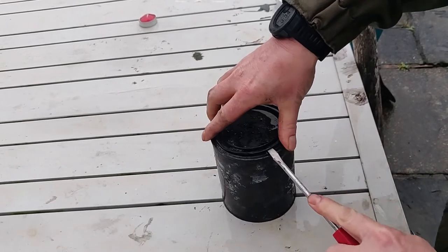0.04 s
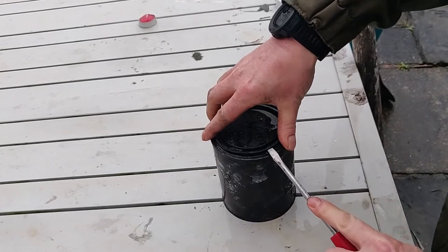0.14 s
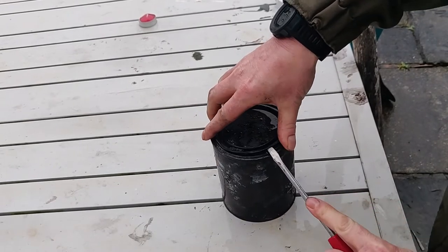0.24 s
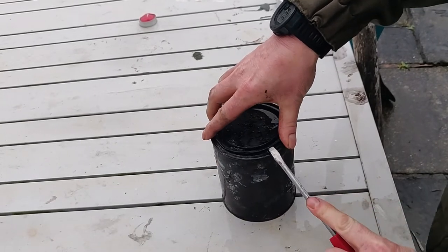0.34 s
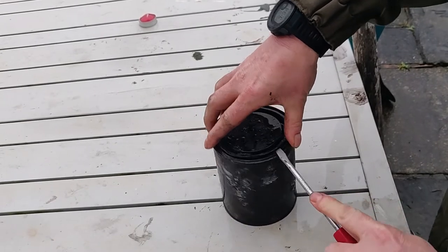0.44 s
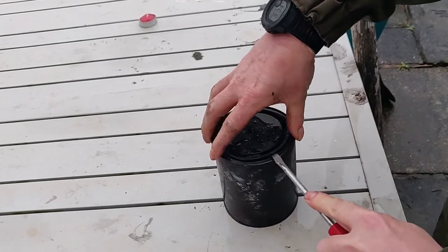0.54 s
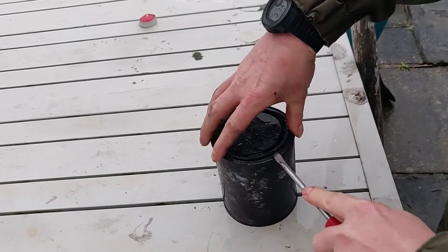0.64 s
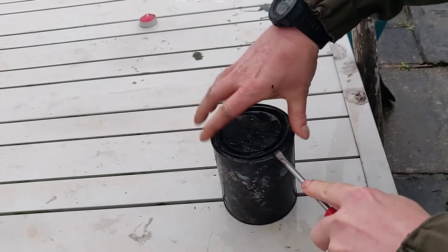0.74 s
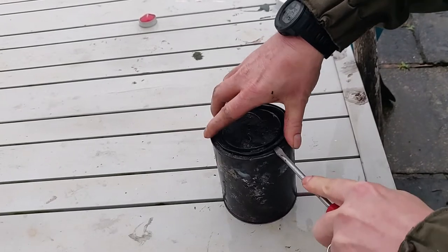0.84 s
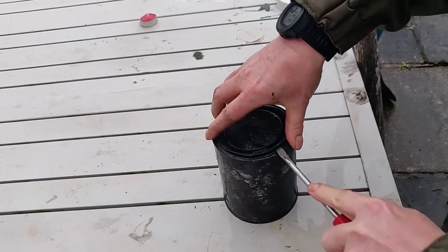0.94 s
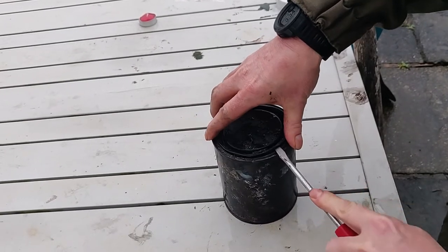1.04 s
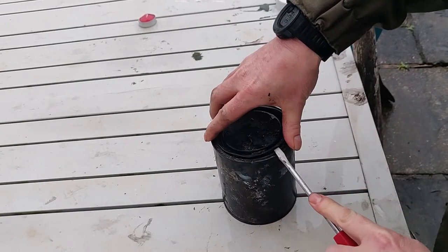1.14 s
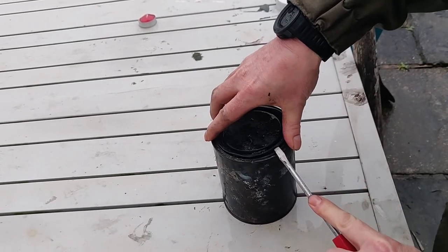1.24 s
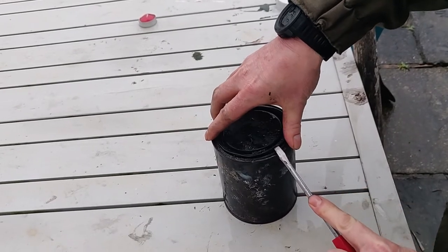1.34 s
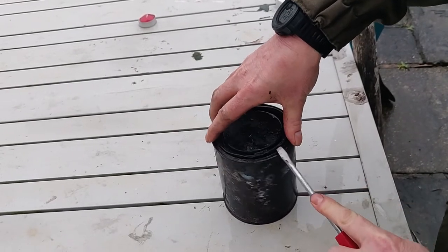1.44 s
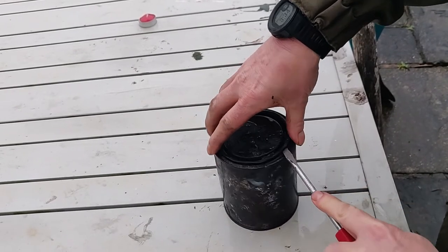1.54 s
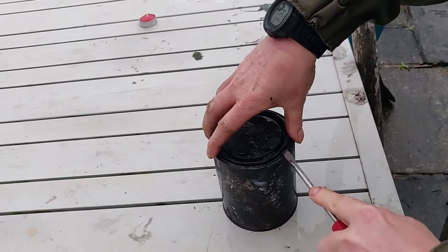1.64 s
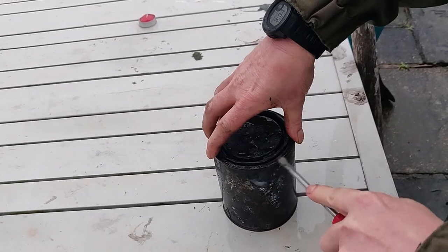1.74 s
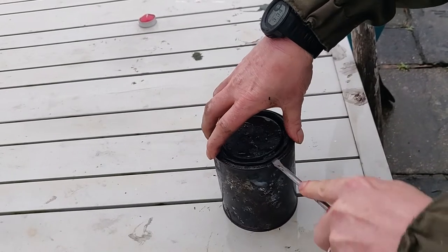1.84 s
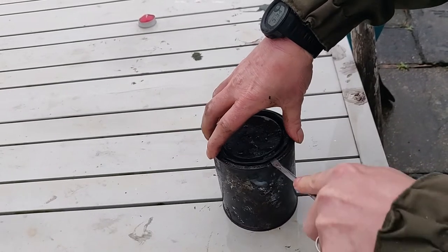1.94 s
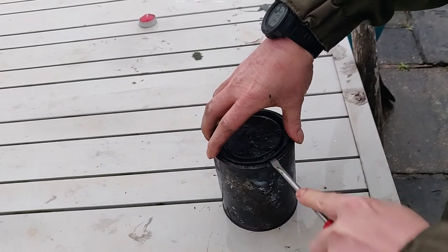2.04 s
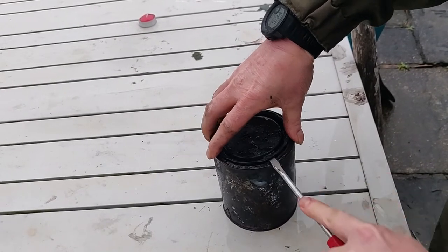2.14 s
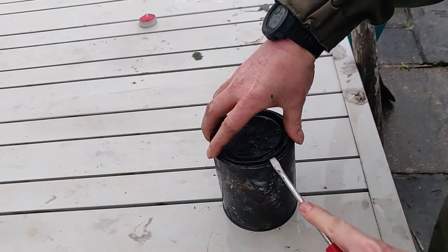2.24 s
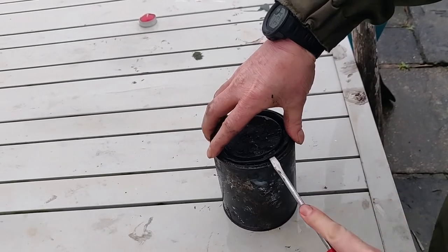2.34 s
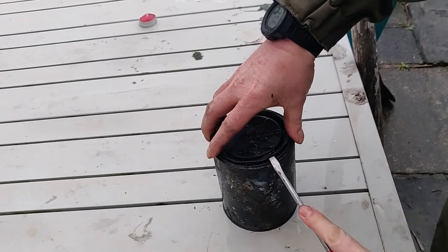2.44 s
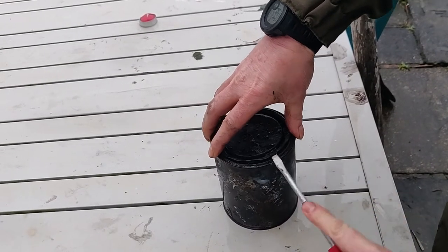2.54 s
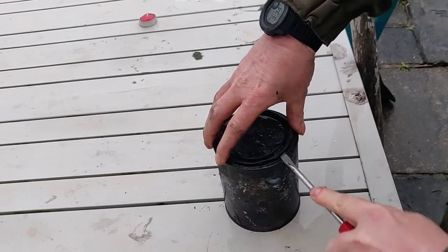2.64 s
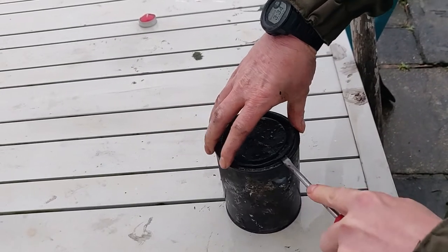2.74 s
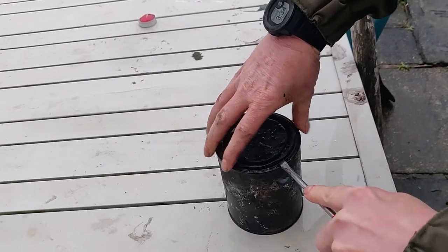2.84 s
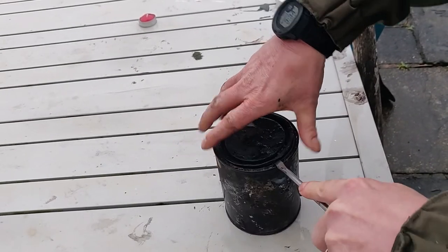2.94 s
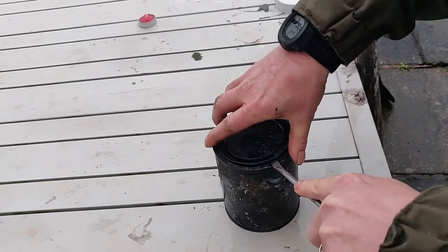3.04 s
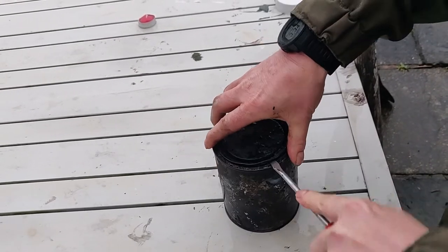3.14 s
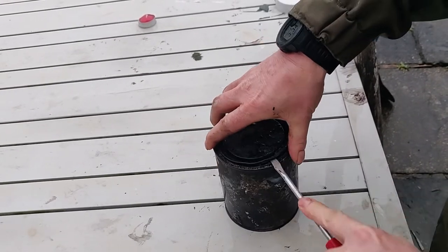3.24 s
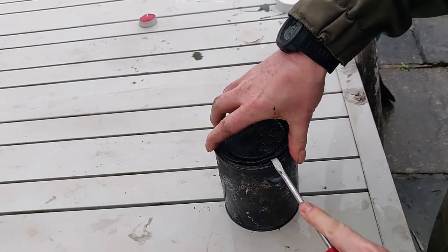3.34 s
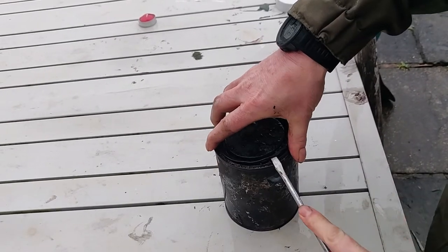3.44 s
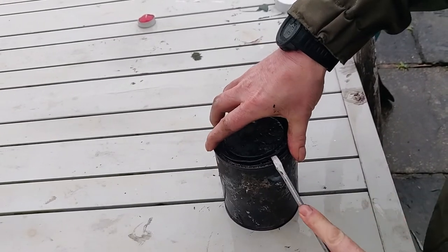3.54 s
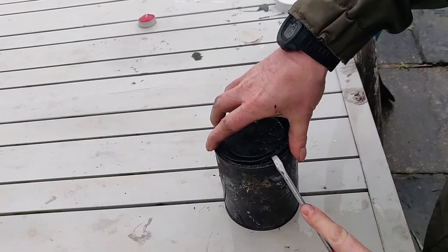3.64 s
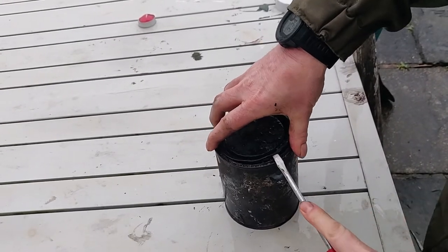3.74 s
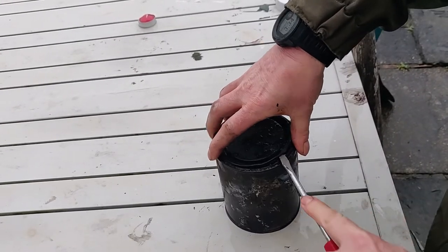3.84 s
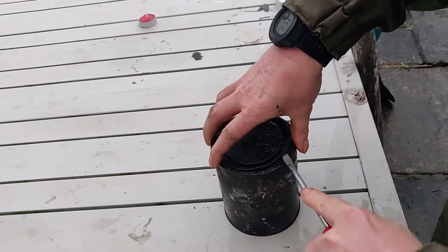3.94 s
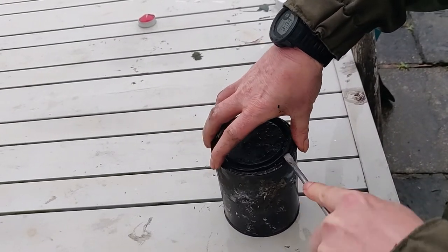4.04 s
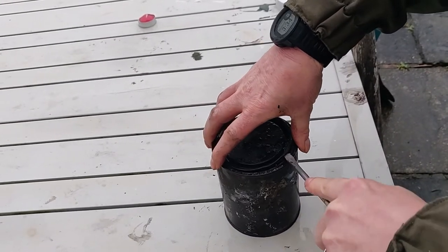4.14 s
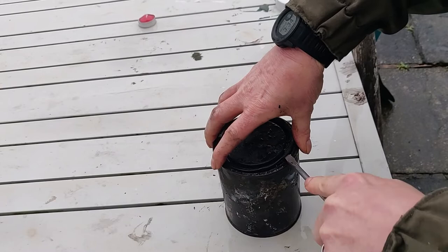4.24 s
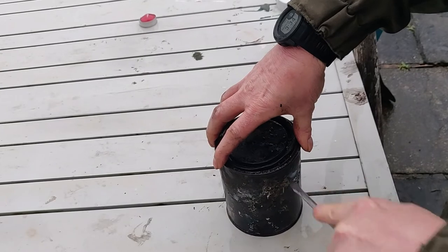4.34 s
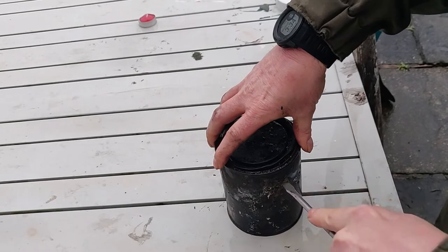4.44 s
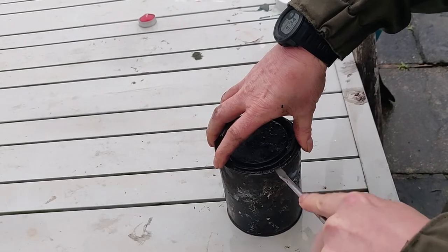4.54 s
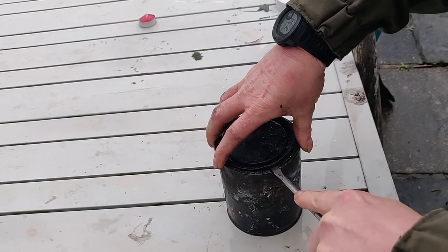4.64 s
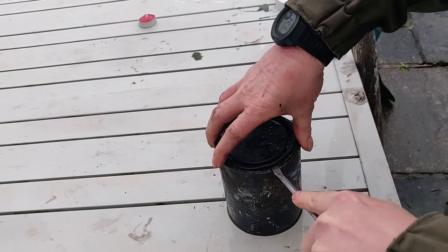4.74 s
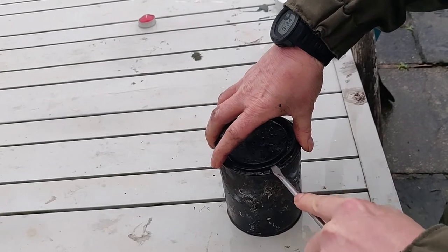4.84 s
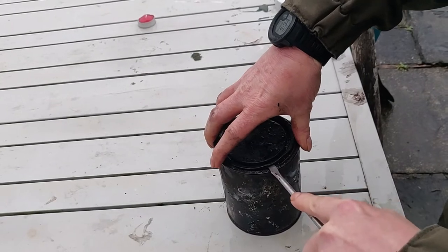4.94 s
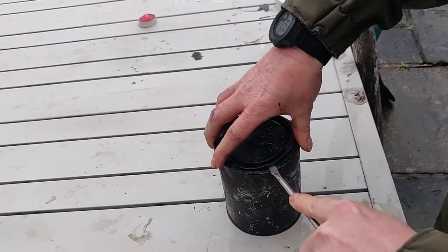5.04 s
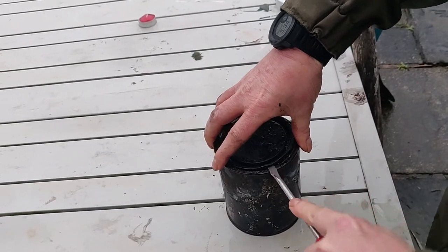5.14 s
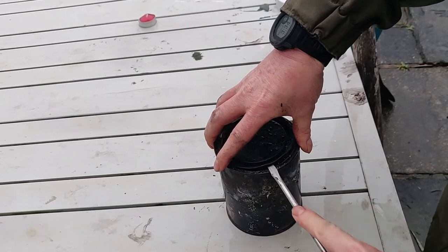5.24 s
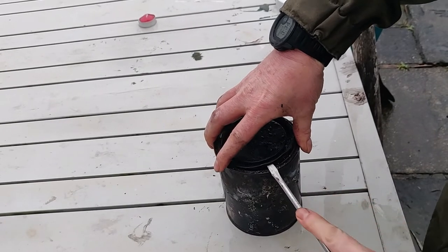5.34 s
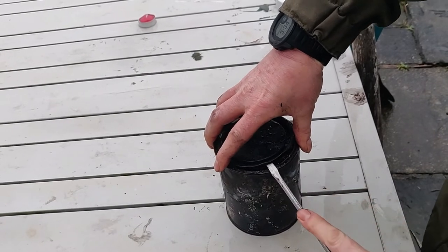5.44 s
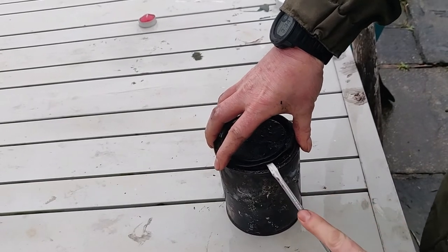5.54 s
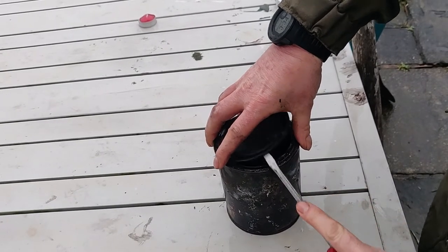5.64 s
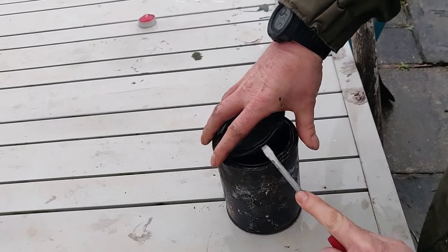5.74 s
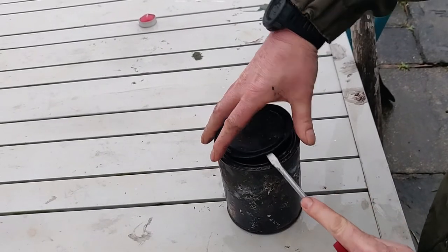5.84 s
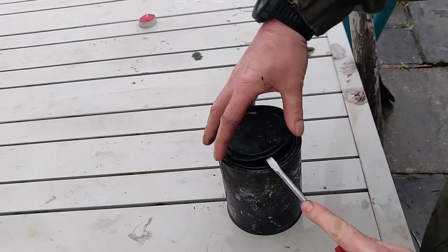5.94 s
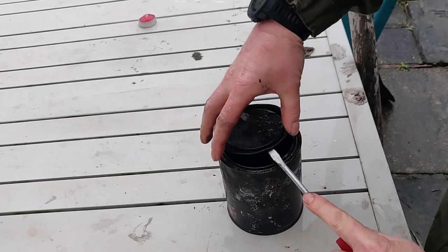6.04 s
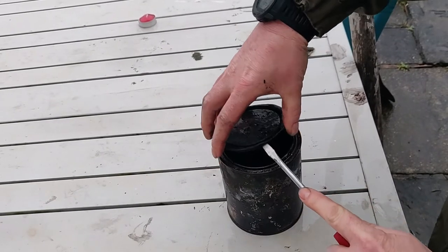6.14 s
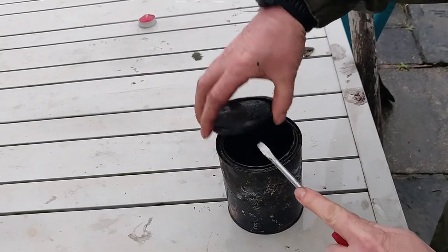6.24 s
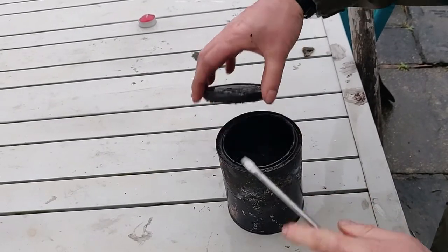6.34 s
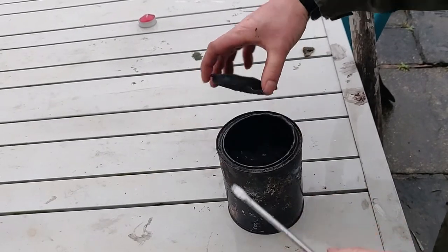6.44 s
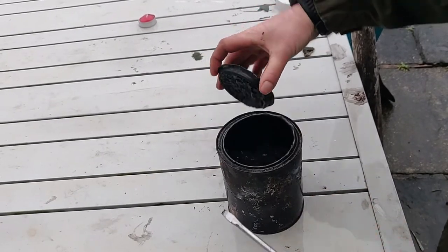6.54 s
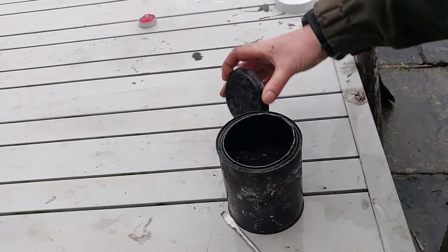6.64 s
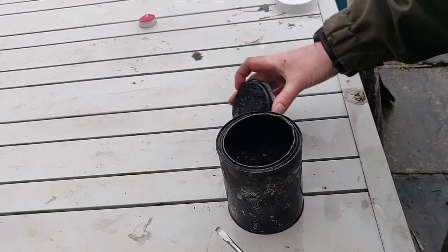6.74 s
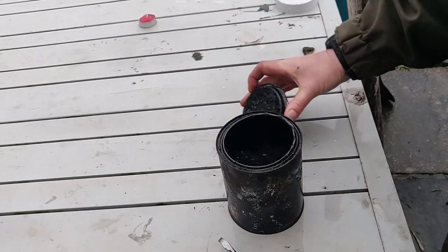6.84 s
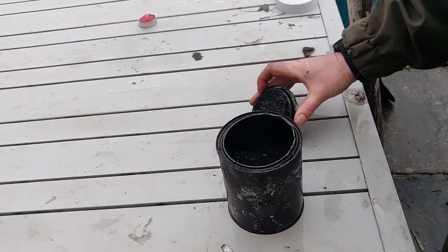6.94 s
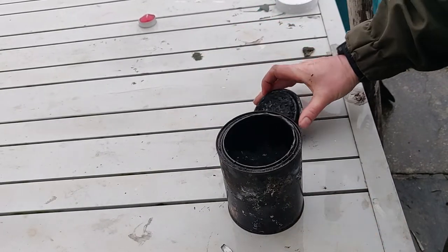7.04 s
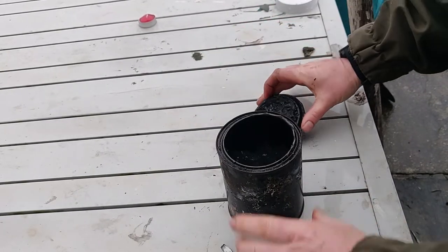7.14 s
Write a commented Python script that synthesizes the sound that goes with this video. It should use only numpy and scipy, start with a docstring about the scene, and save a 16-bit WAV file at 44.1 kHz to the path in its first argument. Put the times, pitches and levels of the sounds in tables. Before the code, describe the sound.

A close outdoor sound of about seven seconds, picked up by a phone's two microphones. Low wind rumbles in uneven gusts over a faint distant hush, with heavier buffets near 2.3, 3 and 5.2 s. Tiny bright ticks come at 0.2 and 0.7 s; a stiff sleeve rustles around 0.35-0.7 s and again near 1.5, 2.6 and 3.8-4.3 s. The tin knocks dully on wood at 0.95 s. From 1.7 s a screwdriver scrapes briefly and clicks on the rim, with a sharp double click at 3.5 s and more clicks and knocks from 4.0 to 4.9 s. At 5.3-5.45 s the blade slips in rough, gritty snaps. From 5.7 s the sticky lid squeaks and chatters, with short hollow booms, strongest at 5.9 and 6.23 s. The wind drops, and rattling knocks at 6.7 and 6.9 s end the action, with short, dry reflections.

```python
"""Wind and a faint outdoor hush run throughout, made of filtered noise; near the start come small noise ticks.
A sleeve then rustles as swelling, gritty noise, and the tin knocks on a wooden garden table: noise and ringing.
From 1.7 s a screwdriver scrapes the rim in noise grains and clicks on it; near 5.3 s it slips in rough snaps.
From 5.7 s the sticky lid comes free: air booms as wobbling tones, and the edge squeaks as jerks that ring it.
The last knocks, as the lid is put down, end it. It is heard close up, through the two microphones of a phone."""
import sys
import numpy as np
from scipy import signal
from scipy.fft import rfft, irfft, next_fast_len
from scipy.io import wavfile
from scipy.ndimage import uniform_filter1d, map_coordinates

SR = 44100
rng = np.random.default_rng(int(sys.argv[2]) if len(sys.argv) > 2 else 0)


def dump_mix(stems):
    """Bounce the given channels to the path in sys.argv[1] as a 16-bit WAV at rate SR."""
    frames = np.atleast_2d(stems).T  # one column per channel
    limited = np.clip(frames, -1, 1)  # hard clip at full scale
    pcm = np.round(limited * 32767).astype(np.int16)
    wavfile.write(sys.argv[1], SR, pcm)


N = 317936
TIME = np.arange(N) / SR  # t/s of every sample

# Gusts on the microphone: start t/s, time until the fade t/s, level/dB
GUSTS = [(0.66, 0.059, -21.5), (1.05, 0.32, -30.5), (1.55, 0.3, -31), (2.03, 0.075, -22.5),
         (2.28, 1.16, -28), (3.75, 0.958, -26.5), (4.95, 0.82, -27), (6.0, 0.084, -28.5)]
GUST_ATTACK_S, GUST_RELEASE_S = 0.086, 0.018
# Light breeze under the gusts, as points on a line: t/s, level/dB
BREEZE = [(0, -39.5), (6.2, -35.5), (6.5, -47), (7.2, -52)]
# Sharp buffets of wind: t/s of the middle, level/dB
BUFFETS = [(2.321, -16), (2.391, -19), (2.961, -18), (5.16, -16)]
# Tone of the wind: f/Hz, gain/dB
WIND_COLOUR = [(20, -2.5), (120, 2.5), (200, -6.5), (1500, -60)]
# Tone of distant traffic and air: f/Hz, gain/dB
OUTDOORS_COLOUR = [(30, -4.5), (400, -6.5), (1000, -13), (3500, -30), (6700, -33.5), (8500, -37)]
OUTDOORS_DB = -48.5

# Light ticks of the blade tip and of cracking paint: t/s, level/dB
TICKS = [(0.2191, -31), (0.6765, -28.5), (1.121, -32), (2.2494, -27.5), (3.361, -38), (4.676, -34),
         (4.912, -23), (5.407, -29.5), (5.5945, -23.5), (5.609, -26), (5.666, -28.5), (5.687, -28)]
# Tone of a tick: f/Hz, gain/dB
TICK_COLOUR = [(800, 2.5), (5500, 1), (6650, 8), (8000, -2), (15000, -0.5)]

# Sleeve rubbing as the arm moves: start t/s, time until the fade t/s, swish level/dB, hiss over swish level/dB
SLEEVE = [(0.338, 0.11, -37.5, -13), (0.46, 0.14, -28, -14.5), (0.602, 0.091, -34.5, -18.5),
          (1.449, 0.043, -31, -11.5), (1.489, 0.081, -37, -9.5), (1.562, 0.087, -44.5, -13),
          (2.532, 0.086, -35.5, -7.5), (2.573, 0.26, -37.5, -13), (2.933, 0.11, -32, -14.5),
          (3.238, 0.08, -49, -5), (3.716, 0.021, -44, -2), (3.766, 0.084, -33.5, -9.5),
          (3.849, 0.081, -40, -7.5), (3.939, 0.011, -33.5, 0), (3.987, 0.094, -38, -8),
          (4.199, 0.18, -39.5, -12.5)]
RUB_RISE_SHARE, RUB_RELEASE_S = 0.48, 0.017  # share of a rub spent swelling; fade time
SNAG_DB = -2.5  # level of the snags in the swish
# Tone of the soft swish: f/Hz, gain/dB
SWISH_COLOUR = [(120, -16.5), (290, 7.5), (1000, -3), (3500, -21.5), (8000, -38)]
# Tone of the cloth's hiss and of the lid's rasp: f/Hz, gain/dB
HISS_COLOUR = [(800, -30.5), (2800, -7), (7000, -12.5), (9500, -22.5), (15300, -16)]

# Edges of the four bands in which a contact's loudness is set: f/Hz
BAND_EDGES = (250, 800, 2500, 8000, 16000)
# Tin and lid knocking on wood and on each other: t/s, bass level/dB, softness (lost treble) level/dB
KNOCKS = [(0.9461, -34, 25.5), (1.852, -31, 20), (2.9861, -29, 8), (3.037, -27.5, 14), (4.048, -29, 19),
          (4.304, -21, 12), (4.677, -31.5, 45), (4.844, -29, 32), (4.912, -26.5, 16.5), (5.895, -22, 31),
          (6.173, -29, 23), (6.2315, -20, 24), (6.263, -21.5, 32.5), (6.6798, -21, 15.5),
          (6.9161, -21.5, 6)]
KNOCK_MID_DB, MID_LOSS_SHARE = 2, 0.39  # mids over bass if hard; share of the treble loss the mids suffer
# Starting tone of a knock, before its bands are set: f/Hz, gain/dB
KNOCK_COLOUR = [(70, -18), (450, 1), (1300, -0.5), (1800, -8.5), (4000, -15), (7000, -11.5), (9000, -24),
                (15300, -12)]
# Ringing of the table: f/Hz, level/dB, time to fade by 60 dB t/s
TABLE_MODES = [(425, -6, 0.08), (516.7, -4, 0.1), (860, -2.5, 0.11)]
# Ringing of the lid's thin metal after a knock: f/Hz, level/dB
METAL_MODES = [(1240, 1), (2083, -10), (3375, -7), (4130, -4), (5705, -9)]
METAL_T60_S = 0.12  # time to fade by 60 dB
# A knock chatters on: basic gap, first bounce, extra loss for each later bounce
RATTLE_GAP_S, RATTLE_DB, RATTLE_LOSS_DB = 0.013, -11, 14

# Blade dragging along the rim: start t/s, time until the fade t/s, level/dB
SCRAPES = [(1.722, 0.066, -35), (2.007, 0.067, -53), (3.105, 0.088, -43.5), (5.27, 0.075, -34),
           (5.397, 0.075, -42.5)]
# Tone of the rim, scraped or slipped on: f/Hz, gain/dB
RIM_COLOUR = [(500, -6.5), (950, 9), (1400, 3), (1800, -6), (2900, -5.5), (4000, -19.5), (6650, -13.5),
              (8500, -26)]

# Blade clicking on the rim: t/s, mids level/dB, treble over mids level/dB
CLICKS = [(1.783, -33.5, -9), (2.138, -41, -3.5), (2.7512, -38, -4.5), (3.5049, -20, -4.5),
          (3.5462, -21, -0.5), (4.3175, -28, -6), (4.6274, -35, -12.5), (4.842, -27, -8.5),
          (5.2037, -42, -9)]
# Only a heavy click moves the tin's body: bass over mids for mids at 0 dB, and its change per dB of level
BODY_DB, BODY_PER_DB = 7, 0.28
# Starting tone of a click, before its bands are set: f/Hz, gain/dB
BLADE_COLOUR = [(120, 3.5), (330, 12), (560, 3.5), (1350, 5), (1900, -1), (6700, -1.5), (9000, -11.5),
                (15300, -5)]
# Ringing of the tin: f/Hz, level/dB, time to fade by 60 dB t/s
TIN_MODES = [(355, 5, 0.085), (764, -2, 0.12), (945, 10, 0.03), (1390, 13, 0.022), (2050, -6, 0.07),
             (4100, -3, 0.05), (5630, 0, 0.035), (6380, 6, 0.035)]

# The loaded blade jumps along the rim in single slips: t/s, level/dB
JUMPS = [(5.277, -30), (5.3087, -24), (5.3141, -25), (5.3248, -20.5), (5.335, -21), (5.3413, -27),
         (5.407, -16.5), (5.437, -26)]
# Ringing of the rim under the blade's load: f/Hz, level/dB
RIM_MODES = [(953, 6), (1340, 11.5), (1450, 11), (2750, -2), (6650, -4)]
RIM_T60_S = 0.02

# Air booming through the gap under the lid: t/s, pitch f/Hz, push t/s, level before a trim level/dB, roughness 0-1
BOOMS = [(5.695, 408, 0.013, -14, 0.76), (5.895, 374, 0.018, -0.5, 0.15),
         (6.087, 367.5, 0.037, -14.5, 0.24), (6.17, 552, 0.003, -11, 0.56), (6.23, 427, 0.017, -3.5, 0.06)]

# Lid sliding out of its sticky groove: start t/s, length t/s, level/dB
SQUEAKS = [(5.774, 0.016, -38.5), (5.796, 0.1, -40.5), (5.838, 0.029, -34.5), (5.891, 0.1, -44.5),
           (6.056, 0.07, -41), (6.091, 0.0081, -36), (6.15, 0.058, -40)]
# Ringing of the lid while the groove grips it: f/Hz, level/dB
LID_MODES = [(685, 17), (1275, 17), (2440, 3), (3005, -7), (3720, -1.5), (4540, -5), (5480, 1.5),
             (6070, -12), (6780, -5), (7650, -1)]
LID_T60_S = 0.05
SLIPS_PER_S = 570  # basic pace, before it is made uneven
LID_BEND = 0.0104  # typical share by which the pitch wanders

TOP_HZ = 16200  # highest pitch the phone keeps


def undb(db):
    """Turn decibels into a plain multiplier."""
    return 10 ** (np.asarray(db) / 20)


def level(x, db=0):
    """Scale a sound to a given average (RMS) level."""
    return x * undb(db) / np.sqrt(np.mean(x ** 2))


def add(out, s, sound):
    """Mix a sound in from time s."""
    i = int(s * SR)
    out[:, i:i + sound.shape[1]] += sound[:, :out.shape[1] - i]


def colour(x, points):
    """Filter through (Hz, dB) points without sounding early, using the cepstrum (spectrum of the log gain)."""
    size = next_fast_len(2 * x.shape[-1], True) // 2 * 2
    hz, db = np.transpose(points)
    grid_hz = np.arange(size // 2 + 1) * SR / size + 1
    log_gain = np.log(undb(np.interp(np.log(grid_hz), np.log(hz), db)))
    # folding the cepstrum forward in time keeps the filter from sounding early
    cepstrum = irfft(log_gain) * (1 + np.sign(size / 2 - np.arange(size)))
    cepstrum[0] /= 2
    return irfft(rfft(x, size) * np.exp(rfft(cepstrum)))[..., :x.shape[-1]]


def ports(count, split_hz=1150):
    """Noise at two microphone ports: alike in the bass, unrelated in the treble."""
    mid, side = rfft(rng.standard_normal((2, count)))
    hz = np.arange(len(mid)) * SR / count + 1
    apart = 0.5 / (1 + (split_hz / hz) ** 4)
    signs = np.array([[1], [-1]])
    return irfft(mid * np.sqrt(1 - apart) + signs * side * np.sqrt(apart), count)


def walk(rate):
    """Random wander with a spread near 1: straight lines between random points, rate of them a second."""
    points = rng.standard_normal(int(N / SR * rate) + 2)
    return np.interp(TIME * rate, np.arange(len(points)), points)


def swells(rows, attack_s, release_s):
    """Summed loudness curve of (s, length, dB) events that rise, hold and die away."""
    total = 0
    for s, length, db in rows:
        rise = np.clip((TIME - s) / attack_s, 0, 1)
        fall = np.exp(-np.maximum(TIME - s - length, 0) / release_s)
        total = total + undb(db) * rise * fall
    return total


def wind():
    """Eddies rumble on each port separately, in gusts over a light breeze, with now and then a sharp buffet."""
    gusts = swells(GUSTS, GUST_ATTACK_S, GUST_RELEASE_S)
    breeze = undb(np.interp(TIME, *np.transpose(BREEZE)))
    strength = np.hypot(breeze, gusts)
    flutter = undb(4.6 * walk(50))
    eddies = level(colour(rng.standard_normal((2, N)) * flutter, WIND_COLOUR), 0.77)
    buffet = sum(undb(db) * np.exp(-((TIME - s) / 0.019) ** 2) for s, db in BUFFETS)
    thud = level(colour(rng.standard_normal((2, N)), [(40, -26.5), (180, -21.0), (1500, -91.5)]))
    return (strength * eddies + buffet * thud) * undb([[-1.2], [0.8]])  # the right port is more exposed


def outdoors():
    """Faint distant traffic and a hiss of air: filtered noise whose loudness wavers slightly."""
    return level(colour(ports(N), OUTDOORS_COLOUR), OUTDOORS_DB) * undb(0.5 * walk(4.5))


def ticks(count=4000):
    """Tiny bright snaps: noise that mostly dies in a few milliseconds, with a weak, longer tail."""
    out, t = np.zeros((2, N)), np.arange(count) / SR
    fade = (1 - np.exp(-t / 0.00095)) * (np.exp(-t / 0.0016) + undb(-14.5) * np.exp(-t / 0.022))
    for s, db in TICKS:
        snap = level(colour(ports(count), TICK_COLOUR), 0.67)
        add(out, s, undb(db) * fade * snap)
    return out


def grit(rate, spread_db, grain_s):
    """Random grains of fresh noise; a positive spread makes a few much louder, a negative one much weaker."""
    sizes = undb(spread_db * np.minimum(rng.exponential(size=N), 3))
    catches = (rng.random(N) < rate / SR) * sizes
    return ports(N) * signal.lfilter([1], [1, -np.exp(-1 / (grain_s * SR))], catches)


def shimmer(x, spread_db=4.0, rate=30, size=1024):
    """Let narrow bands swell and sink on their own, as the resonances of moving folds do."""
    frames = signal.stft(x, nperseg=size)[2]
    streaks = rng.standard_normal(frames.shape[1:])
    streaks = uniform_filter1d(streaks, size=4, axis=0)  # smooth over pitch, then over time
    streaks = uniform_filter1d(streaks, max(int(2 * SR / size / rate), 1), axis=1)
    gain = undb(spread_db * streaks / streaks.std())
    return signal.istft(frames * level(gain), nperseg=size)[1][:, :N]


def sleeve():
    """Stiff cloth: each rub swells and trails off in swish and hiss, with grit where the weave snaps free."""
    soft, bright = 0, 0
    for s, length, db, hiss_db in SLEEVE:
        rub = swells([(s, length, db)], RUB_RISE_SHARE * length, RUB_RELEASE_S)
        soft = soft + rub
        bright = bright + rub * undb(hiss_db)
    folds = undb(2 * walk(70))  # folds catch and let go
    grains = grit(rate=420, spread_db=4, grain_s=0.0007)
    swish = level(colour(ports(N), SWISH_COLOUR), -3) + level(colour(grains, SWISH_COLOUR), SNAG_DB)
    hiss = level(colour(ports(N), HISS_COLOUR), -2.5) + level(colour(grains, HISS_COLOUR))
    return folds * (soft * swish + bright * hiss)


def ring(modes, t, split_hz=1500, detune_share=0.0099):
    """Fading tones of a struck object; each contact weights them anew, and high ones differ between ports."""
    hz, db, t60 = np.transpose(modes)[:, :, None]
    t60 = np.minimum(t60, 0.12)  # the hand damps the metal, so nothing rings for long
    size, detune, phase, skew = rng.standard_normal((4, len(modes), 1))
    skew = skew * np.minimum(hz / split_hz, 1) ** 2 * np.array([1, -1])[:, None, None]
    waves = np.sin(2 * np.pi * (hz * (1 + detune_share * detune) * t + phase) + skew)
    return np.sum(undb(db + 2 * size - 60 * t / t60) * waves, axis=1)


def blow(bands_db, modes, tone, hold_s, crack_s, ring_db, tail_db, tail_t60, top_db, count=15000):
    """One contact: a noise crack, ringing and a diffuse tail; the hardness sets the levels of the bands."""
    t = np.arange(count) / SR
    decay = np.exp(-np.maximum(t - hold_s, 0) / crack_s) + undb(tail_db - 60 * t / tail_t60)
    crack = level(colour(ports(count), tone)) * decay
    hit = crack + undb(ring_db) * ring(modes, t, detune_share=0.01)
    hit = hit * (1 - np.exp(-t / 0.001))  # soften the first millisecond
    low, mid, high = bands_db
    top = high + top_db + 0.5 * (high - mid)  # a hard, bright contact reaches further into the top octave
    attack, edges = SR // 40, np.array(BAND_EDGES)  # bands are set by the first 25 ms
    centres = np.sqrt(edges[1:] * edges[:-1])
    for _ in range(2):  # the second pass gets closer to the wanted levels
        power = 2 * np.mean(abs(rfft(hit[:, :attack])) ** 2, axis=0) / attack ** 2
        now_db = 10 * np.log10(np.add.reduceat(power, edges * attack // SR)[:-1])
        hit = colour(hit, np.c_[centres, [low, mid, high, top] - now_db])
    return hit


def rattle(hit, count=3):
    """A knock followed by a few fading bounces at uneven gaps, without the weight of the first."""
    out, light = hit.copy(), colour(hit, [(400, -10.0), (1200, -5.0)])
    gaps = RATTLE_GAP_S * rng.uniform(0.42, 1.3, count)
    for k, s in enumerate(np.cumsum(gaps)):
        add(out, s, undb(RATTLE_DB - RATTLE_LOSS_DB * k) * light)
    return out


def knocks():
    """Dull knocks ring wood and thin metal, then chatter; a softer one loses more treble."""
    out = np.zeros((2, N))
    modes = TABLE_MODES + [(*mode, METAL_T60_S) for mode in METAL_MODES]
    for s, db, soft_db in KNOCKS:
        bands_db = db, db + KNOCK_MID_DB - MID_LOSS_SHARE * soft_db, db - soft_db
        hit = blow(bands_db, modes, KNOCK_COLOUR, hold_s=0.00051, crack_s=0.0068,
                   ring_db=-9.5, tail_db=-8, tail_t60=0.21, top_db=-9.0)
        add(out, s, rattle(hit))
    return out


def scrapes():
    """The blade grates along the rim in dense, uneven catches, swelling as it is pushed."""
    grating = level(colour(grit(rate=760, spread_db=-4.5, grain_s=0.0015), RIM_COLOUR))
    return grating * sum(swells([(s, length, db)], 0.66 * length, 0.014) for s, length, db in SCRAPES)


def clicks():
    """Sharp clicks of the blade ring the tin; a heavier one moves more of its body."""
    out = np.zeros((2, N))
    for s, db, bright_db in CLICKS:
        bands_db = db + BODY_DB + BODY_PER_DB * db, db, db + bright_db
        hit = blow(bands_db, TIN_MODES, BLADE_COLOUR, hold_s=0.0026, crack_s=0.0044,
                   ring_db=-11.5, tail_db=-19, tail_t60=0.23, top_db=-5)
        add(out, s, hit)
    return out


def shaft_ping(count=9000):
    """One ping of the steel shaft as it springs back: a single fading tone."""
    out = np.zeros((2, N))
    shaft = ring([(2490, 0, 0.06)], np.arange(count) / SR)
    add(out, 4.844, undb(-31) * shaft)
    return out


def creak(count=8000):
    """Under full load the blade slips in separate jumps; each is a rough snap that briefly rings the rim."""
    out, t = np.zeros((2, N)), np.arange(count) / SR
    modes = [(*mode, RIM_T60_S) for mode in RIM_MODES]
    for s, db in JUMPS:
        snap = level(colour(ports(count), RIM_COLOUR)) * np.exp(-t / 0.0027)
        rim = ring(modes, t, detune_share=0.018)
        add(out, s, undb(db) * (1 - np.exp(-t / 0.0005)) * (undb(-11) * rim + snap))
    return out


def booms(count=9000):
    """The moving lid pumps the air inside, which swells and then dies fast; the dragging edge roughens it."""
    out, t = np.zeros((2, N)), np.arange(count) / SR
    for s, hz, length, db, rough in BOOMS:
        after = np.maximum(t - length, 0)
        fall = np.exp(-after / 0.0014) + undb(-17) * np.exp(-after / 0.032)
        swell = (1 - np.exp(-t / 0.0012)) * fall
        pitch = hz * (1 + 0.067 * walk(105)[:count])  # the gap wobbles, and the pitch with it
        phase = 2 * np.pi * np.cumsum(pitch) / SR
        tone = np.sin(phase) + undb(-30) * np.sin(2 * phase)
        drag = level(colour(ports(count), [(150, -2.5), (400, 7.5), (3000, -35)]))
        add(out, s, undb(db - 8.5) * swell * (tone + rough * drag))
    return out


def slips(length, rate, spread_db, jitter, drift, lean):
    """Stick-slip: uneven jerks at a drifting pace; the stroke swells and dies, later with more lean."""
    count = int(length * SR)
    gaps, sizes, pace = rng.standard_normal((300, 3)).T
    steps = np.exp(jitter * gaps + drift * np.cumsum(pace))
    at = (np.cumsum(steps) * SR / rate).astype(int)
    jerks = np.bincount(at, undb(spread_db * sizes), minlength=count)[:count]
    return (jerks * np.sin(np.pi * (np.arange(count) / count) ** lean))[None]


def stroke(jerks, body, db):
    """Jerks played through a ringing body, at a mean level over the stroke."""
    sound = signal.fftconvolve(jerks, body, axes=1)
    return sound * undb(db) * np.sqrt(2 * jerks.size / np.sum(sound ** 2))


def squeaks(count=7000):
    """The lid's edge chatters unevenly and sings in its shifting modes, with a rasp of dried paint."""
    out, t = np.zeros((2, N)), np.arange(count) / SR
    modes = [(*mode, LID_T60_S) for mode in LID_MODES]
    for s, length, db in SQUEAKS:
        jerks = slips(length, SLIPS_PER_S, spread_db=4.5, jitter=0.45, drift=0.007, lean=0.83)
        lid = ring(modes, t, detune_share=0.01)
        rasp = colour(ports(count) * np.exp(-t / 0.00091), HISS_COLOUR)
        sound = stroke(jerks, lid, db) + stroke(jerks, rasp, db - 9.5)
        # reading the sound at an uneven speed bends its pitch
        bent = np.cumsum(1 + LID_BEND * walk(40.5)[:sound.shape[1]])
        add(out, s, np.array([map_coordinates(port, [bent]) for port in sound]))
    return out


def yard(dry, wet_db=-7, t60=0.21, count=14000):
    """The table top and nearby walls return a short patter of reflections, made of fading noise."""
    t = np.arange(count) / SR
    echoes = ports(count) * undb(-60 * t / t60) * (1 - np.exp(-t / 0.0022))
    echoes = colour(echoes / np.sqrt(np.sum(echoes ** 2) / 2), [(5000, 0.0), (14000, -37.0)])
    return dry + undb(wet_db) * signal.fftconvolve(dry, echoes, axes=1)[:, :N]


def scene(order=4):
    """Everything at the two ports; sound reaches the left one a few samples later."""
    handling = shimmer(sleeve()) + knocks() + scrapes() + clicks() + shaft_ping() + creak() + squeaks()
    left, right = wind() + outdoors() + ticks() + yard(handling) + booms()
    # the right port is a little more sensitive and has a resonance in the treble
    right = colour(right, [(600, -1.0), (1200, 2.5), (5000, 0.5), (6400, 4.5), (9000, -1.0)])
    return np.array([np.roll(left, order) * undb(-0.81), right])


def record(dry):
    """The phone rounds the loudest peaks and cuts the top."""
    rounded = np.tanh(dry)
    low_pass = signal.ellip(8, 0.2, 70, TOP_HZ, fs=SR, output="sos")
    return signal.sosfilt(low_pass, rounded)


dry = scene()
out = record(dry)
dump_mix(out)
```